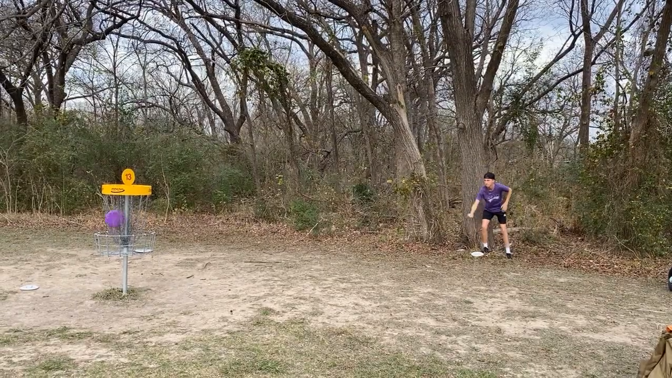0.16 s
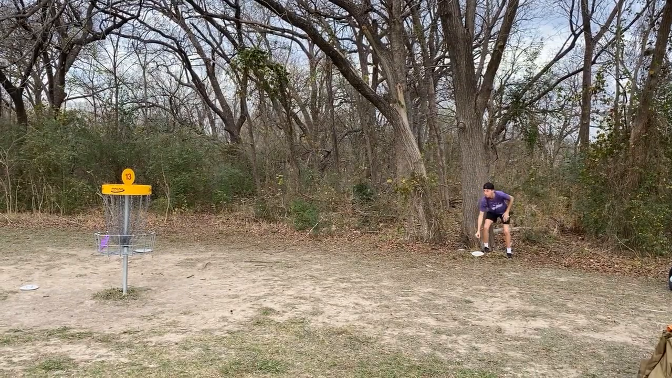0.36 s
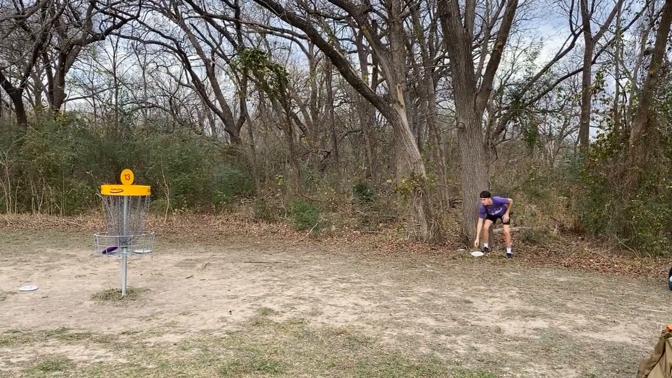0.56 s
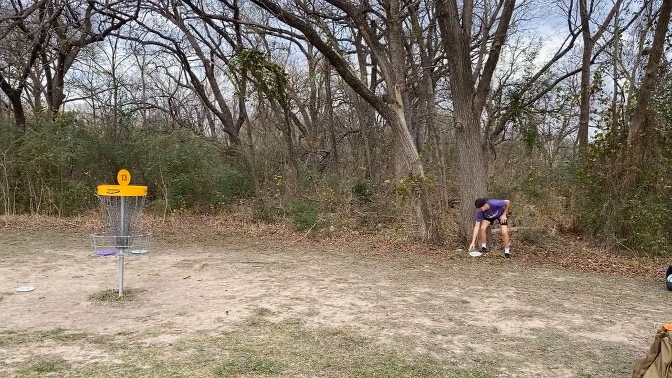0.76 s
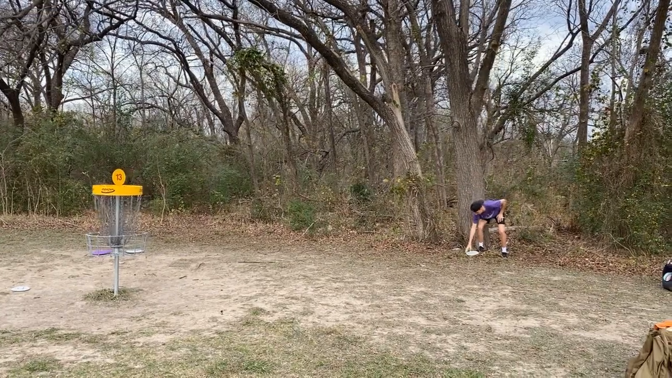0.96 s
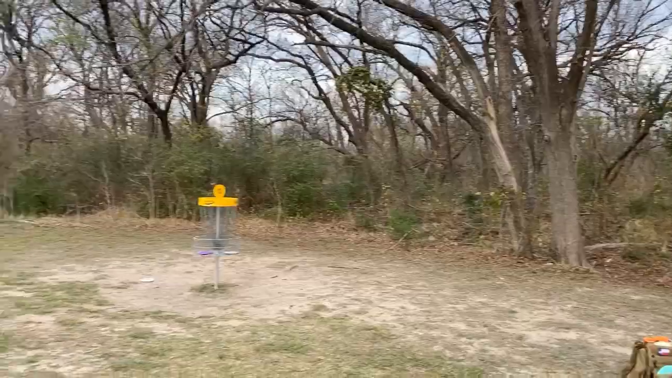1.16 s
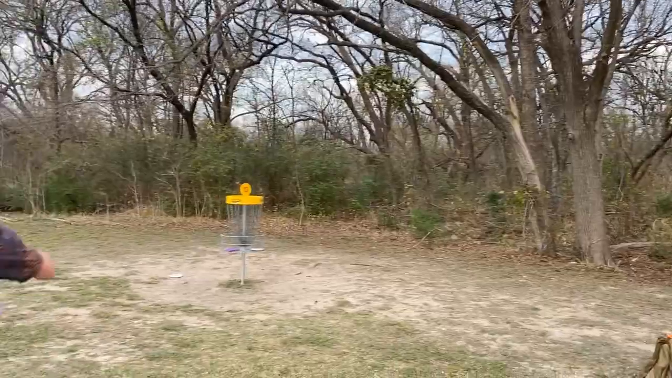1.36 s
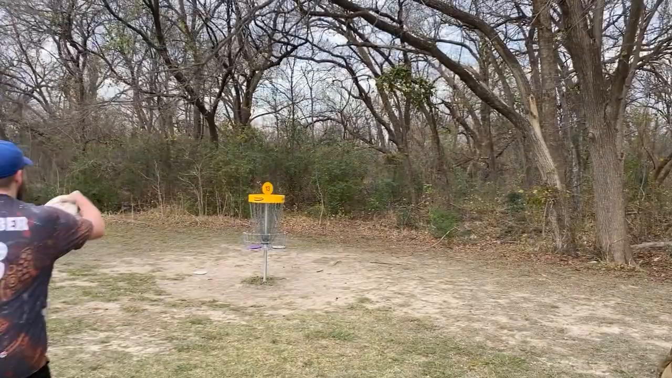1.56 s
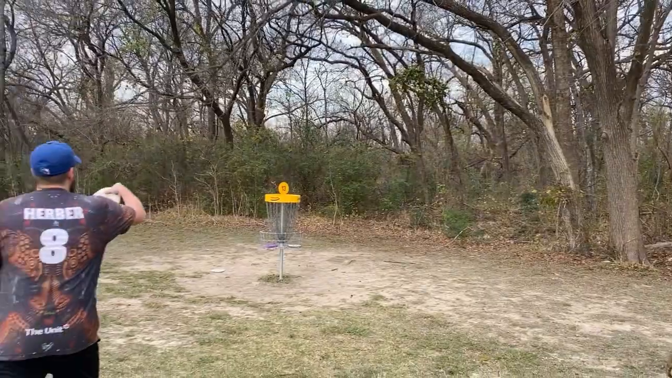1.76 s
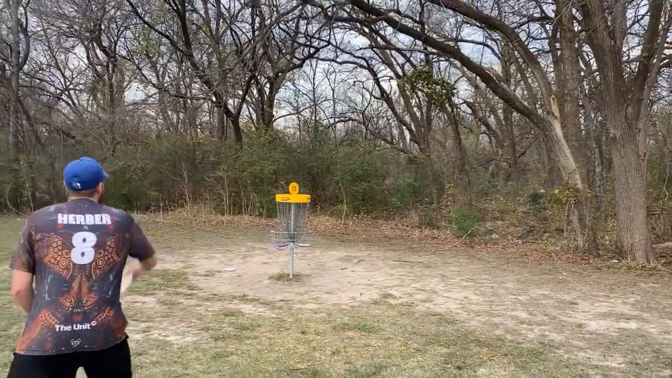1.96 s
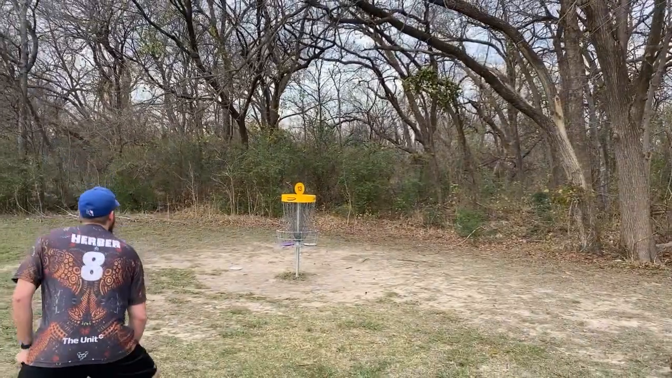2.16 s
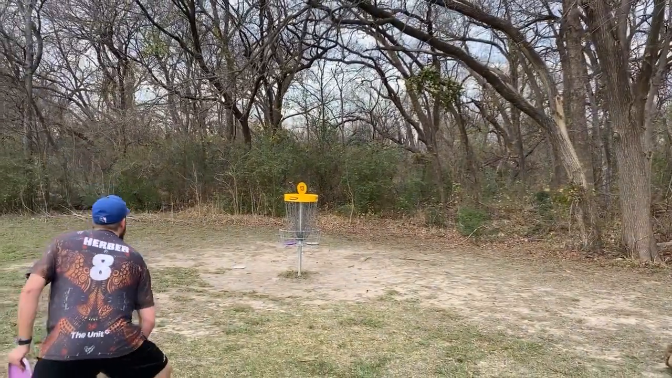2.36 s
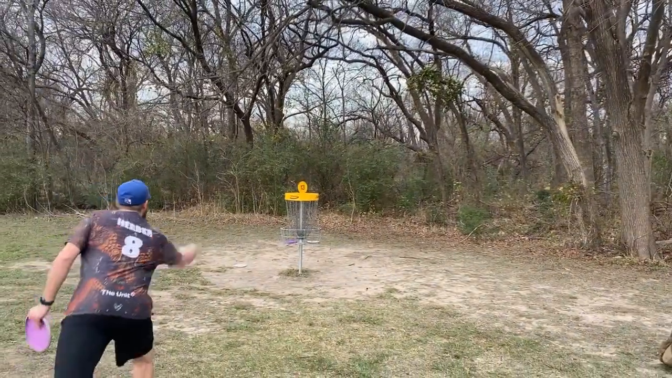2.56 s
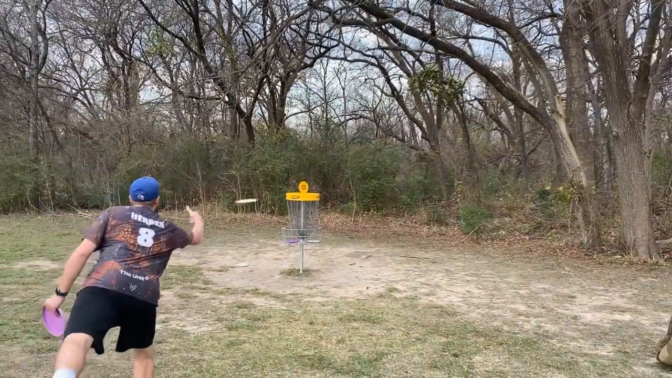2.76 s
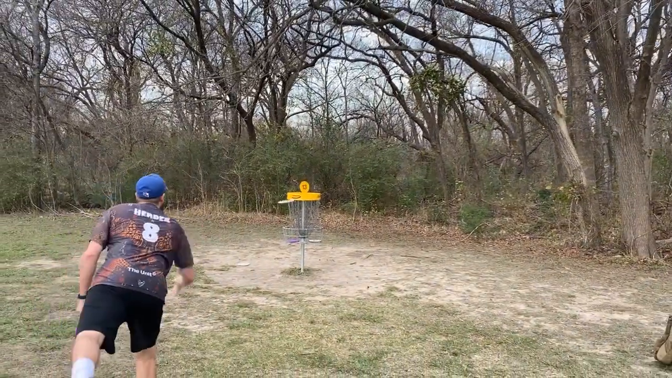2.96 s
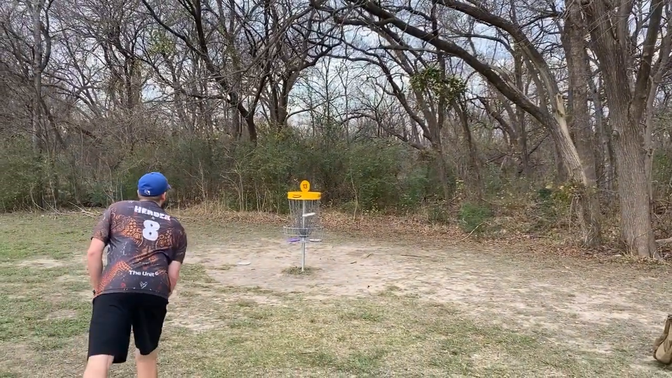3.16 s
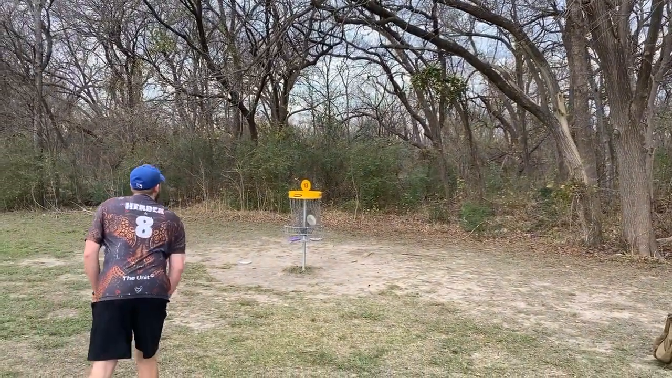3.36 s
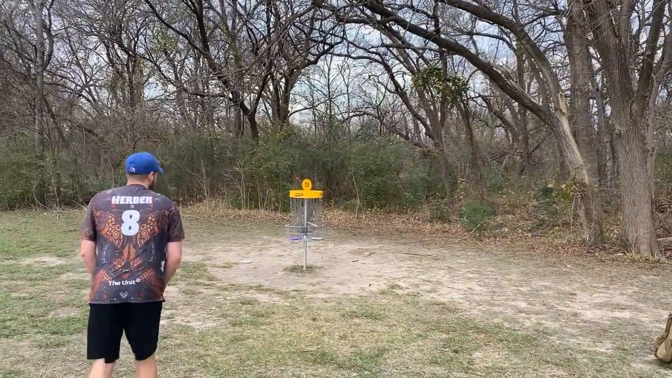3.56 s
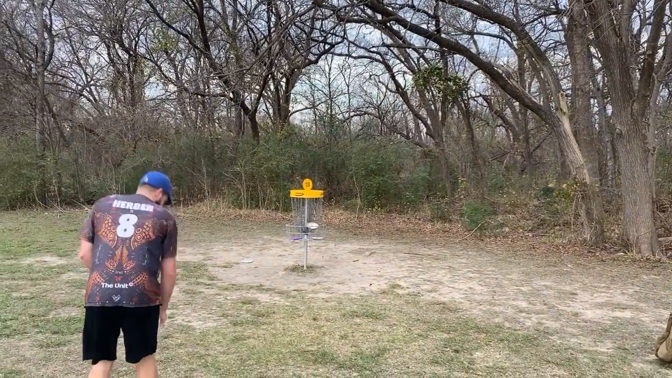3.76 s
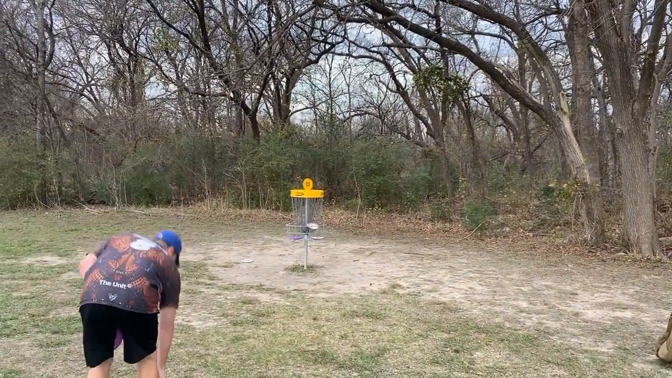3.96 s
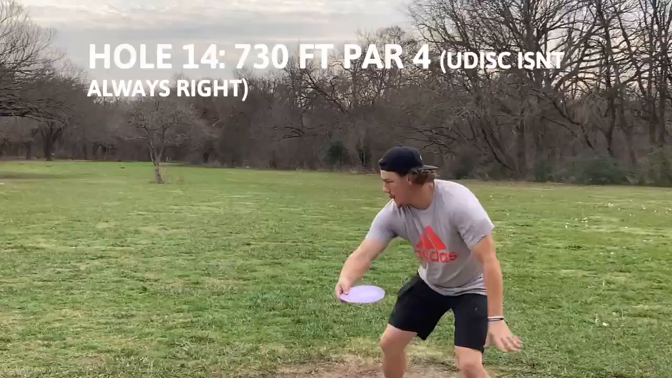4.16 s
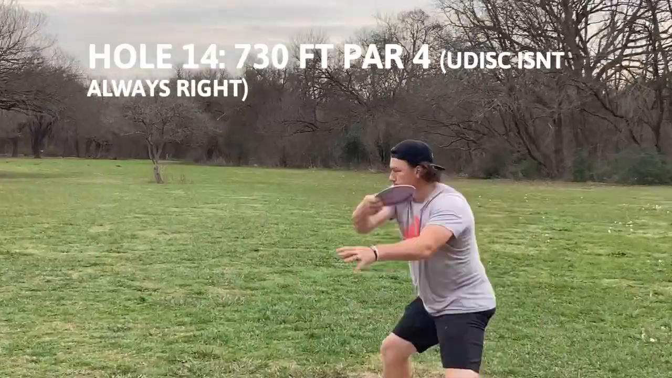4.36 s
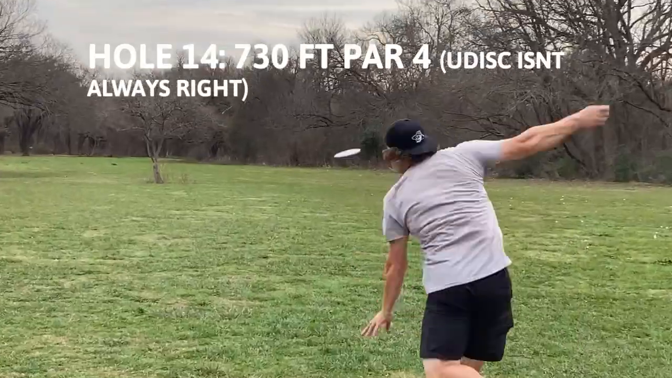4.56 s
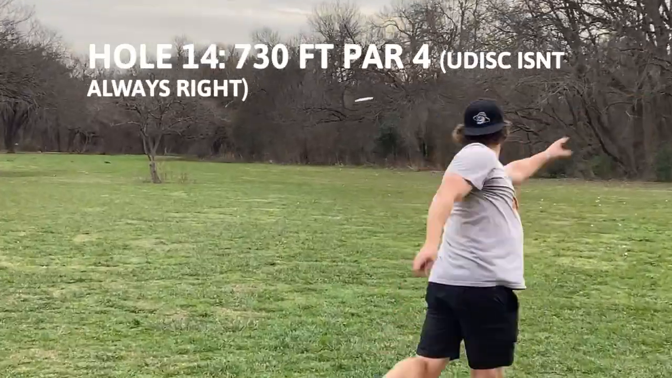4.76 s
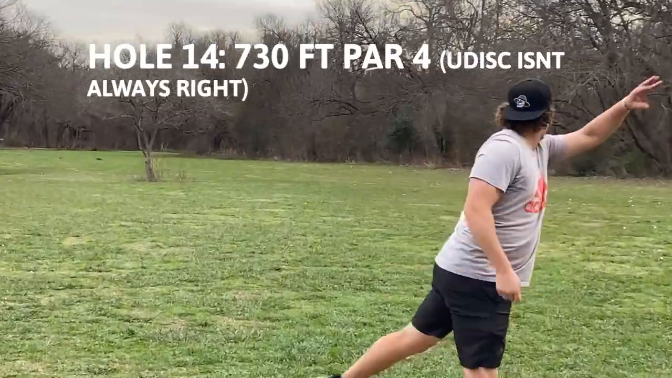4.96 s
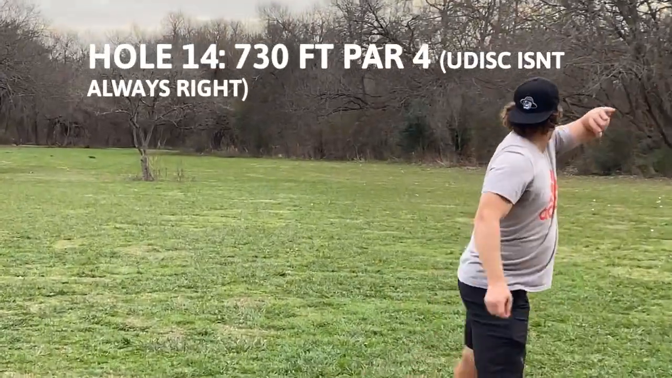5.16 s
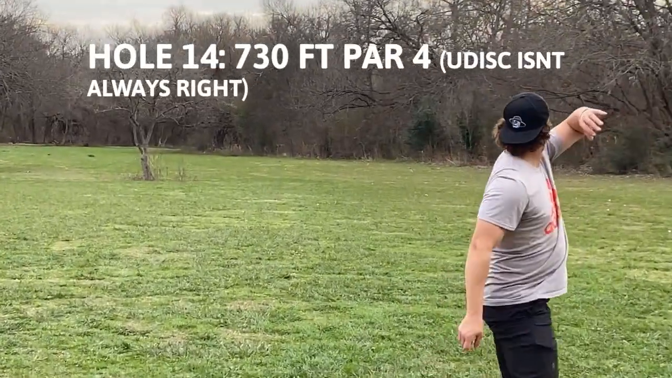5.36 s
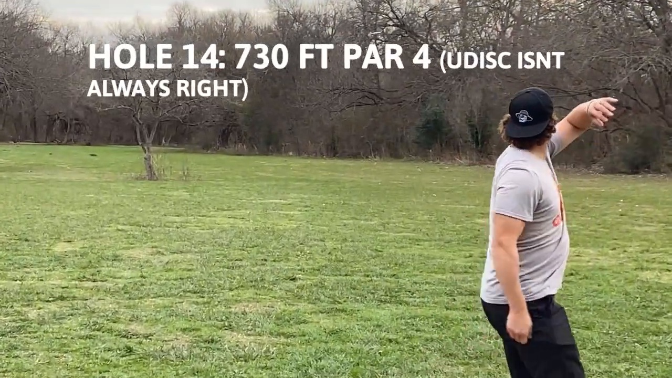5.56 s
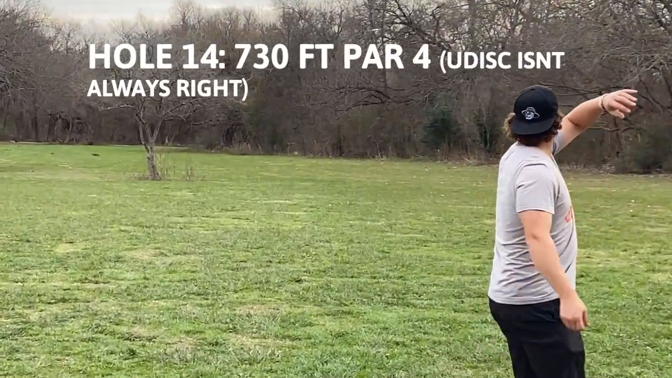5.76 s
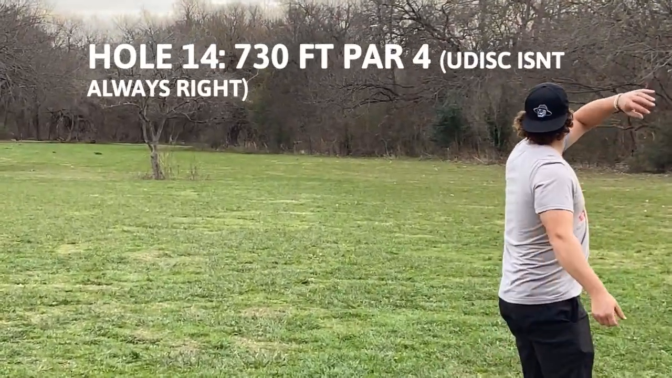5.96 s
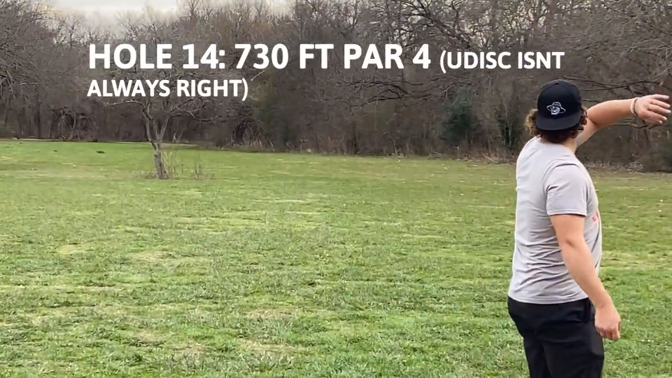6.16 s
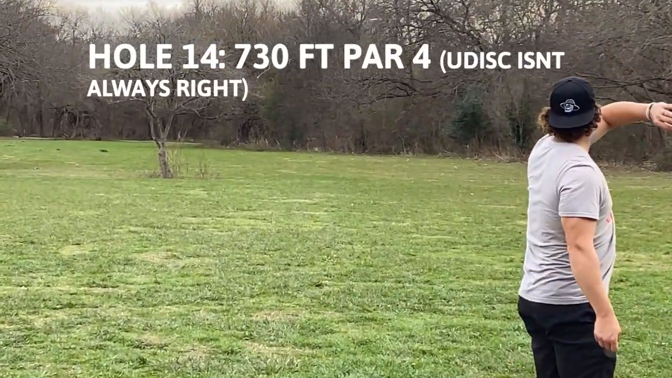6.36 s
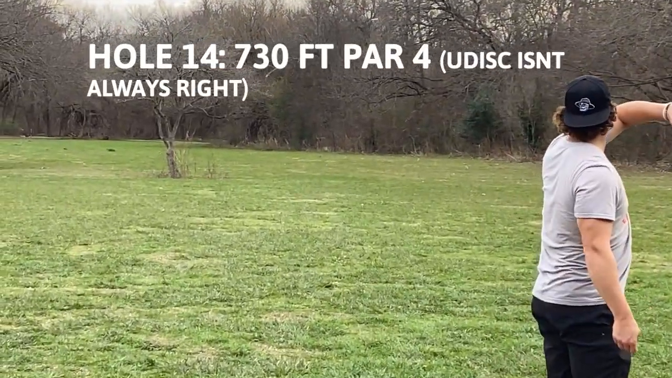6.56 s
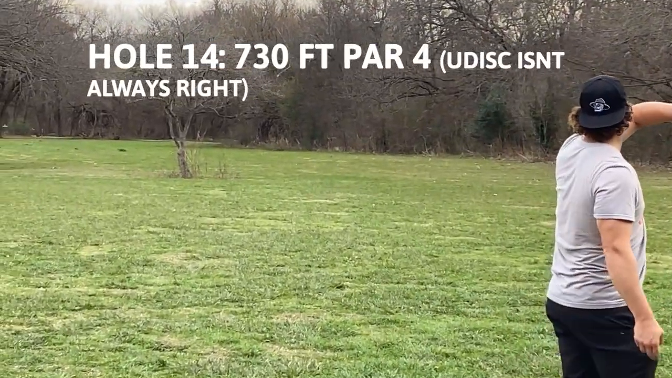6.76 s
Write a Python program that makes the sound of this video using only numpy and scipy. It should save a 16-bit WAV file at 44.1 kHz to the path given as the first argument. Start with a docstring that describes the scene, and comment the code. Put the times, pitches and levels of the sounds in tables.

```python
"""Over the hum of distant traffic a putt hits the chains of a disc golf basket in a wood: struck steel links ring
and jingle, the plastic disc clacks, and pole and tray sing on as stored energy returns; it ends abruptly at 1.1 s.
Shoes then scuff grass as crackling noise and a car swells past as filtered noise. A putt at another basket at 3.2 s
ends as abruptly at 4.2 s, a small bird peeping meanwhile in gliding whistles. Then a far engine, a sum of shaft
orders, speeds up; a player moves across a meadow, a far songbird repeats its motif, and a near one joins in."""
import sys
import numpy as np
from scipy import signal
from scipy.fft import rfft, irfft, next_fast_len
from scipy.io import wavfile
from scipy.ndimage import map_coordinates

SR = 44100
rng = np.random.default_rng(int(sys.argv[2]) if len(sys.argv) > 2 else 0)


def generate_wav(signal):
    """Clip the signal to [-1, 1] and save it as 16-bit WAV at the path in sys.argv[1]."""
    frames = np.transpose(np.atleast_2d(signal))
    scaled = np.clip(frames, -1, 1) * 32767
    pcm = np.round(scaled).astype(np.int16)
    wavfile.write(sys.argv[1], SR, pcm)


N = 300762
TIME = np.arange(N) / SR  # seconds
RING = np.arange(SR // 2) / SR  # seconds after a blow
TOP_HZ = 15600  # upper band limit of the whole sound

# Ends of the first two of three places, in seconds.
PLACE_ENDS = [1.107, 4.207]

# Distant traffic at each place. Each row: rumble in dB, low roar in dB, tyre hiss in dB, all before slow drift.
PLACES = [(-42.5, -55, -54), (-42.5, -52, -49.5), (-43.5, -53.5, -56.5)]
# Relative noise spectra of far roads, of a passing car's tyres, and of leaves and open air.
# Each row: frequency in Hz, level in dB per Hz.
RUMBLE = [(12, -43.5), (20, -18.5), (29, -23), (41, -2.5), (70, 3), (119, -1), (156, -9), (225, -12.5),
          (275, -21.5), (400, -22.5), (520, -47.5), (880, -120)]
ROAR = [(150, -13), (260, 0), (400, -1), (620, 3.5), (800, 1), (1100, -12), (2000, -36), (6000, -71)]
TYRES = [(500, -20), (800, 5), (1000, 5), (1500, -1.5), (2100, -9.5), (3000, -17.5), (5000, -29),
         (9000, -38), (15000, -50)]
CAR = [(500, -24), (800, -2), (1050, 11), (1400, -4), (2200, -31), (5000, -49.5), (10000, -71.5)]
AIR = [(1500, -20), (3000, 0.5), (7300, -1), (10000, -7), (13000, -11), (15000, -24)]
CAR_S, CAR_WIDTH_S, CAR_DB = 3.105, 0.16, -48  # when the car is nearest, how long it stays near, its peak level
AIR_DB = -75

# Far engine's speed. Each row: time in seconds, shaft speed in Hz before a slight wander.
ENGINE = [(4.2, 34.3), (4.46, 35.1), (4.86, 42.12), (6.03, 50.46), (6.82, 49.6)]
# Weights of the second, third and fourth shaft orders, in dB.
ENGINE_ORDERS = [0, 0, -6]
# How strongly an order carries at each pitch. Each row: frequency in Hz, level in dB.
EXHAUST = [(66, -41.5), (71, -40), (76, -33), (83, -42), (100, -46.5), (110, -56.5), (125, -46),
           (150, -49.5), (168, -72), (197, -53)]

# Reverberation of the wood. Each row: frequency in Hz, t60 in seconds.
WOOD = [(200, .4), (3000, 0.94), (6000, 0.65), (14000, 0.22)]

# Far songbird's motif. Each row: start within the motif in seconds, length in seconds,
# four pitches evenly spread over the note in Hz, level in dB before the gain of the repeat.
MOTIF = [(0, .056, 2606, 3350, 3730, 3870, -56), (.155, 0.0326, 2660, 2550, 2610, 2730, -55.5),
         (.21, .042, 3250, 3130, 2850, 2450, -54)]
# Repeats of the motif. Each row: start in seconds, gain in dB.
MOTIF_STARTS = [(4.191, -3.5), (4.537, -5), (4.879, -3.5), (5.233, -5)]
# Near songbird's phrase. Each row: start within the phrase in seconds, length in seconds,
# four pitches evenly spread over the note in Hz, level in dB before the gain of the repeat.
PHRASE = [(0, .096, 1880, 2480, 2770, 2765, -56), (.108, .051, 3440, 3000, 3315, 3750, -49.5),
          (.191, .12, 4595, 4080, 3440, 3160, -48), (.361, .037, 4860, 3350, 2755, 2815, -52.5),
          (.406, .043, 2422, 2470, 2323, 1770, -55)]
# Repeats of the phrase. Each row: start in seconds, gain in dB.
PHRASE_STARTS = [(5.238, -8), (5.785, 0), (6.339, 0)]
JOINS_S = 5.55  # the near bird joins in near the end of its first phrase
# A small bird's calls. Each row: start in seconds, pitch in the middle of the call in Hz, level in dB.
PEEPS = [(3.676, 3190, -53.5), (3.765, 3150, -68), (3.915, 2900, -66), (3.984, 2900, -64),
         (4.145, 2975, -62)]

# Relative noise spectrum of crackling grass. Each row: frequency in Hz, level in dB per Hz.
GRASS = [(300, -20), (900, -9.5), (1800, 11.5), (3200, 10.5), (5000, 6.5), (8000, 5.5), (13000, -1),
         (15500, -8.5)]
# Relative noise spectrum of a landing heel. Each row: frequency in Hz, level in dB per Hz.
THUD = [(80, 2), (300, 5.5), (1800, -1), (4000, -29.0)]
# Shoes and clothes brushing the grass. Each row: peak in seconds, rise and fall time in seconds, level in dB.
SCUFFS = [(1.141, .025, -68.5), (1.285, .02, -62.5), (1.39, .09, -63.5), (1.66, 0.05, -64.5),
          (1.93, 0.066, -57), (2.06, .06, -59.5), (2.235, 0.041, -51.5), (2.49, 0.054, -69.5),
          (2.88, 0.016, -63), (2.99, .04, -64.5), (4.475, 0.038, -42), (4.843, 0.019, -49),
          (4.99, 0.086, -56.5), (5.17, 0.065, -61), (5.33, 0.051, -58), (5.435, 0.009, -46.5),
          (6.37, 0.107, -62.5)]
# Swings of arm, cloth and sole. Each row: peak in seconds, width in seconds, level in dB, centre in Hz.
SWISHES = [(.99, .06, -45.5, 650), (1.085, .018, -42.5, 614), (1.36, 0.043, -49, 1620),
           (2.26, 0.026, -49.5, 1470), (2.96, 0.0384, -52, 600), (4.46, 0.019, -39.5, 1650),
           (4.487, 0.0077, -41.5, 1480), (4.84, 0.0197, -53, 1995), (5.433, 0.012, -47, 726)]
# Footfalls and snapping stalks. Each row: start in seconds, initial crackle in dB, initial thud in dB.
STEPS = [(1.111, -64, -38), (1.4424, -51.5, -41.5), (1.959, -58, -39.5), (2.7689, -55, -59),
         (2.969, -65, -37.5), (4.2794, -50, -43.5), (4.3233, -48.5, -43.5), (4.5723, -49.5, -46.5),
         (5.1015, -48.5, -49), (5.1273, -48, -55), (5.1821, -43, -56), (5.24, -50.5, -39.5),
         (5.4361, -44, -48), (6.151, -65, -50)]
STIR_DB, STILL_S = -72, 5.5  # faint rustle of the players, and when this rustle stops

# The plastic disc striking steel. Each row: start in seconds, force of the blow in dB, nominal body pitch in Hz.
KNOCKS = [(.003, -29, 793), (.021, -32.5, 900), (.047, -33.5, 715), (.068, -30.5, 786), (.12, -33.5, 800),
          (0.175, -37, 843), (.266, -31.5, 830), (.274, -33, 847), (0.347, -39, 830), (.362, -38, 1040),
          (.488, -39.5, 790), (3.2303, -30, 953), (3.252, -33.5, 1073), (3.267, -30.5, 880),
          (3.279, -31.5, 1063), (3.302, -36.5, 1100), (3.498, -52, 1090), (3.619, -46, 1120)]
# Nominal modes of the disc. Each row: ratio to the body pitch, level in dB, t60 in seconds.
DISC = [(1, 2, 0.058), (1.25, -1.5, 0.029), (1.8, -5.5, 0.047), (2.35, -7, .03), (3.15, -7.5, 0.028),
        (3.75, -10, 0.033)]
# Relative noise spectrum of the disc's crack. Each row: frequency in Hz, level in dB per Hz.
CRACK = [(100, -14), (220, -3.5), (420, -12), (800, -6.5), (3500, -4), (8000, -24.5)]

# Long tones of pole and tray, one set for each of the two baskets. Each row: frequency in Hz, relative level in dB.
FIRST_CAGE = [(1443, -62.5), (1852, -58), (1895, -58.5), (2132, -68.5), (2406, -60), (2778, -62),
              (2869, -67), (3063, -56), (3187, -65), (3451, -61), (3655, -68.5), (3720, -68), (3973, -66.5),
              (4161, -67)]
SECOND_CAGE = [(1480, -61.5), (1658, -67.5), (1744, -68), (2412, -64), (2972, -64.5), (3214, -67),
               (3332, -58), (3531, -72), (3784, -69), (3881, -72)]
# High tones shared by both baskets. Each row: frequency in Hz, relative level in dB.
CAGE_SHIMMER = [(5259, -67.5), (5490, -68.5), (6584, -73.5), (7343, -69.5), (8150, -74), (9115, -69.5),
                (9679, -70.5)]
# Relative noise spectrum of the dense wire modes. Each row: frequency in Hz, level in dB per Hz.
WIRES = [(1100, -20.5), (1500, -5.0), (1900, 7.5), (2300, -1.5), (3200, 3), (4200, -11), (6000, -12.0), (11000, -32)]

# Bending modes and high modes of a link.
# Each row: centre in Hz, fractional spread between links, nominal level in dB, nominal t60 in seconds.
BENDING = [(4514, .003, 0, 0.19), (4592, .004, 1, .22), (4720, .007, -4.5, .15), (4900, 0.028, -11.5, 0.12)]
HIGH = [(9200, .02, -15.5, 0.11), (11850, .015, 3.5, 0.18), (12800, .013, -0.5, 0.11),
        (14500, 0.022, -22, 0.09)]
# Filter on the clatter of steel on steel. Each row: frequency in Hz, gain in dB.
CONTACT = [(500, -10.5), (900, 1), (1900, -0.5), (2300, -10.5), (3300, 2), (4100, -5), (5100, 4),
           (6500, -2), (8000, 2.5), (10500, -3.5), (13000, -7), (15500, -20)]
# The curtain of chains bunches up, then settles. Each row: peak in seconds, rise in seconds,
# bending ring in dB, high ring in dB, contact clatter in dB before its filter.
SWINGS = [(.01, 0.028, -26.5, -28, -30), (0.056, 0.022, -27.5, -26.5, -32.5), (.095, .018, -27, -31, -28.5),
          (.266, 0.0053, -27, -46, -46), (.315, 0.019, -37, -34.5, -42), (.485, 0.047, -37.5, -34.5, -40),
          (.58, .015, -52, -38.5, -54), (.655, 0.014, -45, -47.5, -55), (.885, .005, -48.5, -57, -59),
          (.93, .01, -37.5, -43, -44.5), (1.03, .03, -49, -51, -55.5), (3.24, .006, -49, -35.5, -36),
          (3.285, .02, -37, -22.5, -30), (3.335, .02, -46, -34.5, -39), (3.4, .03, -46.5, -32.5, -43.5),
          (3.506, 0.01, -41.5, -41, -34.5), (3.622, .008, -49, -40, -44.5),
          (3.676, .025, -61, -40.5, -54.5), (3.865, 0.0072, -72, -69, -58.5), (4.19, 0.1, -79, -48, -63.5)]
# Whole strands slapping together. Each row: start in seconds, bending ring in dB, high ring in dB,
# clatter in dB, all before damping and the contact filter.
CLASHES = [(0.075, -23, -36.5, -25.5), (.085, -18.5, -39, -34), (0.1022, -15.5, -21.5, -26),
           (.111, -20, -29.5, -33.5), (.118, -25.5, -35, -40.5), (.2575, -23, -43.5, -38.5),
           (0.292, -32.5, -30.5, -42), (0.321, -25, -39.5, -39), (.476, -43, -32.5, -33),
           (0.4903, -24.5, -31, -34.5), (0.6513, -37, -48, -55), (0.7007, -38.5, -45.5, -56),
           (0.879, -44.5, -47, -53.5), (0.9158, -37, -47, -43.5), (0.928, -32.5, -40, -49.5),
           (0.9871, -47, -41, -62), (3.2297, -34, -32.5, -31.5), (3.255, -36, -26, -32),
           (3.285, -32, -22.5, -28.5), (3.4946, -36, -34.5, -40), (3.503, -35, -37, -37),
           (3.6156, -47, -42.5, -46), (3.8612, -58, -52, -65), (3.949, -62, -50, -64),
           (4.0257, -68, -46.5, -59), (4.092, -70, -47, -70)]
# a swing's quick drop, its slow settling, and the level where settling takes over
DROP_DB_PER_S, SETTLE_DB_PER_S, SETTLE_DB = 330, 62, -9
# collisions a second at this clatter level, and their growth with the level (dB per dB)
CHAIN_RATE, BUSY_DB, RATE_GROWS = 560, -41.5, .4


def amp(db):
    """Amplitude ratio of a level: 20 dB for each factor of ten."""
    return 10 ** (np.asarray(db) / 20)


def unit(x):
    """Normalisation to rms 1."""
    return x / np.sqrt(np.mean(x ** 2) + 1e-20)


def along(points, hz):
    """Interpolation of (Hz, value) points on a log frequency axis."""
    f, v = np.transpose(points)
    return np.interp(np.log(hz + 1), np.log(f + 1), v)


def curves(rows):
    """Linear interpolation in time: one curve for each column after the time."""
    s, *cols = np.transpose(rows)
    return [np.interp(TIME, s, c) for c in cols]


def wobble(rate):
    """Smooth random modulation, from random knots at this rate a second."""
    knots = rng.standard_normal(int(N * rate / SR) + 4)
    return map_coordinates(knots, [TIME * rate])


def swell(s, width):
    """Gaussian envelope: a smooth rise and fall around time s."""
    return np.exp(-.5 * ((TIME - s) / width) ** 2)


def filtered(x, response):
    """Linear filtering: the spectrum of x times a response of frequency."""
    size = next_fast_len(len(x) + SR // 4)
    return irfft(rfft(x, size) * response(np.fft.rfftfreq(size, 1 / SR)), size)[:len(x)]


def coloured(x, spectrum):
    """Spectral shaping of x, brought to rms 1."""
    return unit(filtered(x, lambda hz: amp(along(spectrum, hz))))


def noise(spectrum, size=N):
    """Coloured noise: white noise shaped by a spectrum, at rms 1."""
    return coloured(rng.standard_normal(size), spectrum)


def decay(t60):
    """Exponential free decay of a struck body: 60 dB in t60 seconds."""
    return np.exp(-np.log(1000) * RING / max(t60, 1e-3))


def add(track, s, sound):
    """Superposition of a sound on the track from time s."""
    part = track[max(round(s * SR), 0):]
    part[:len(sound)] += sound[:len(part)]


def trees(x, wet_db):
    """Scattering by trunks: a soft tail of decaying noise follows the direct sound."""
    hz, t, z = signal.stft(rng.standard_normal(SR), SR, nperseg=256)
    tail = signal.istft(z * amp(-60 * t / along(WOOD, hz)[:, None]), SR, nperseg=256)[1]
    return x + amp(wet_db) * signal.fftconvolve(x, tail / np.linalg.norm(tail))[:N]


def traffic():
    """Incoherent sum of far sources: drifting rumble, roar and tyre hiss, open air, and one car swelling past."""
    rumble_db, roar_db, tyre_db = np.array(PLACES)[np.searchsorted(PLACE_ENDS, TIME)].T
    roads = amp(rumble_db + .8 * wobble(8)) * noise(RUMBLE)
    roads += amp(roar_db + 1.5 * wobble(8.4)) * noise(ROAR)
    roads += amp(tyre_db + 0.41 * wobble(5)) * noise(TYRES)
    car = amp(CAR_DB) * swell(CAR_S, CAR_WIDTH_S) * noise(CAR)
    return roads + car + amp(AIR_DB) * noise(AIR)


def engine():
    """Harmonics of a quickening shaft: low orders boom as they cross the exhaust's resonances."""
    shaft_hz, = curves(ENGINE)
    turn = 2 * np.pi * np.cumsum(shaft_hz * (1 + 0.0055 * wobble(15))) / SR
    hum = np.zeros(N)
    for order, db in enumerate(ENGINE_ORDERS, 2):
        level_db = db + along(EXHAUST, order * shaft_hz) + 1.15 * wobble(11)
        hum += amp(level_db) * unit(np.sin(order * turn))
    return hum * np.clip((TIME - PLACE_ENDS[1]) / 0.0152, 0, 1)


def note(length, *pitches):
    """Frequency modulation: a pure whistle glides smoothly through its pitches."""
    u = np.linspace(0, 1, int(length * SR))
    knots = np.linspace(0, 1, len(pitches))
    hz = np.polyval(np.polyfit(knots, pitches, len(pitches) - 1), u)
    return unit(np.sin(2 * np.pi * np.cumsum(hz) / SR) * signal.windows.tukey(len(u), .3))


def song(notes, starts, from_s=0):
    """Repetition of one set of whistled notes, leaving out those that start before from_s."""
    track = np.zeros(N)
    for start, gain_db in starts:
        for s, *shape, db in notes:
            if start + s > from_s:
                add(track, start + s, amp(db + gain_db) * note(*shape))
    return track


def far_bird():
    """Amplitude fluctuation on the way through branches: a three-note motif flutters."""
    return song(MOTIF, MOTIF_STARTS) * amp(3.6 * wobble(90))


def near_birds():
    """Nearly pure tones: loud slurred whistles, and a small bird's arched peeps with their octave."""
    track = song(PHRASE, PHRASE_STARTS, JOINS_S)
    for s, hz, db in PEEPS:
        arch = hz * np.array([.96, 1, 1.01])
        add(track, s, amp(db) * note(.05, *arch) + amp(-71.5) * note(.05, *(2 * arch)))
    return track * amp(1.18 * wobble(70))


def player():
    """Friction and impact noise: grass crackles under moving shoes, cloth swishes, heels land."""
    stir = amp(STIR_DB) * (TIME > PLACE_ENDS[0]) * (TIME < STILL_S)
    power = stir ** 2
    for s, width, db in SCUFFS:
        power = power + (amp(db) * np.exp(-np.abs(TIME - s) / width)) ** 2
    # sparse random impulses, about 7000 a second
    stalks = rng.standard_normal(N) * (rng.random(N) < 7000 / SR)
    track = np.sqrt(power) * coloured(stalks, GRASS)
    for s, width, db, hz in SWISHES:
        hump = [(hz / 8, -14), (hz / 2, -8), (hz, 0), (hz * 2, -12), (hz * 7, -38), (hz * 20, -60)]
        track += amp(db) * swell(s, width) * noise(hump)
    for s, db, thud_db in STEPS:
        add(track, s, amp(db) * noise(GRASS, size=len(RING)) * decay(0.041))
        add(track, s, amp(thud_db) * noise(THUD, size=len(RING)) * decay(0.07))
    return track


def disc():
    """Modal ringing of a heavily damped body: the plastic disc gives short, hollow clacks."""
    track = np.zeros(N)
    squash = 1 - np.exp(-RING / 0.00022)  # the rim yields for a moment
    for s, db, hz in KNOCKS:
        body = np.zeros(len(RING))
        for ratio, level, t60 in DISC:
            strength = amp(level + rng.normal(0, 4.5))
            mode_hz = hz * ratio * rng.normal(1, 0.044)
            body += strength * decay(t60) * np.sin(2 * np.pi * mode_hz * RING)
        crack = noise(CRACK, size=len(RING)) * decay(0.075)
        add(track, s, amp(db) * squash * (.85 * body + 1.29 * crack))
    return track


def cage(blows, modes, t60, db, wires_db):
    """Energy storage: pole and tray return the blows as long tones over a wash of wire modes."""
    keep = np.exp(-2 * np.log(1000) / (t60 * SR))  # energy kept from one sample to the next
    stored = np.sqrt(signal.lfilter([1 - keep], [1, -keep], blows ** 2))
    tones = np.zeros(N)
    for hz, level in modes + CAGE_SHIMMER:
        # each tone beats against a weaker, randomly detuned twin
        twin = .5 * np.sin(2 * np.pi * (hz + rng.normal(0, 10)) * TIME)
        tones += amp(level) * (np.sin(2 * np.pi * hz * TIME) + twin)
    return stored * (amp(db) * unit(tones) + amp(wires_db) * noise(WIRES))


def link(modes, grip=0.78, contact_s=0.00006):
    """Modal ringing: no two links are alike, and neighbours damp some more than others."""
    free = np.exp(grip * rng.normal())
    ring = np.zeros(len(RING))
    for hz, spread, db, t60 in modes:
        strength = amp(db + rng.normal(0, 4.3))
        mode_hz = hz * (1 + spread * rng.normal())
        ring += strength * decay(t60 * free) * np.sin(2 * np.pi * (mode_hz * RING + rng.random()))
    return ring * (1 - np.exp(-RING / contact_s)) ** 2


def contact(t60, count=16):
    """Impact of steel on steel: a tiny crack and short, scattered partials."""
    hz = rng.uniform(1400, 15000, (count, 1))
    partials = np.sin(2 * np.pi * hz * RING).sum(0) / np.sqrt(count)
    crack = 1.3 * rng.standard_normal(len(RING)) * decay(0.0044)
    return partials * decay(t60) + crack


def collisions(voices, level_db, rate, start, end, scatter_db):
    """Random impact process: links collide at random moments and together carry the given level."""
    passed = np.cumsum(rate * (TIME >= start) * (TIME < end)) / SR  # collisions so far
    count = int(passed[-1])
    moments = np.searchsorted(passed, np.arange(count) + rng.random(count))
    sizes = unit(amp(scatter_db * rng.standard_normal(len(moments)))) * rng.choice([-1, 1], len(moments))
    voices = [v / np.linalg.norm(v) for v in voices]
    track = np.zeros(N)
    for i, size in zip(moments, sizes):
        # rarer collisions are each stronger, so the rate leaves the power unchanged
        strength = size * amp(level_db[i]) * np.sqrt(SR / rate[i])
        add(track, i / SR, strength * voices[rng.integers(len(voices))])
    return track


def slap(voices, spread, count=6):
    """Succession of impacts: a strand lands link after link within milliseconds, at rms 1 over 1/80 s."""
    burst = np.zeros(len(RING))
    for delay in np.r_[0, rng.exponential(spread, count - 1)]:
        add(burst, delay, voices[rng.integers(len(voices))])
    return burst / np.sqrt(np.mean(burst[:SR // 80] ** 2))


def swinging(start, end):
    """Two-stage decay, in dB for bending, high and clatter: a swing swells, drops quickly, settles slowly."""
    power = np.full((3, N), 1e-12)
    slow = min(amp(SETTLE_DB), 1)
    for s, rise, *levels in SWINGS:
        if start <= s < end:
            age = np.maximum(TIME - s, 0)
            fall = (1 - slow) * amp(-DROP_DB_PER_S * age) + slow * amp(-SETTLE_DB_PER_S * age)
            power += np.outer(amp(levels), np.where(TIME < s, swell(s, rise), fall)) ** 2
    return 10 * np.log10(power)


def chains(start, end, count=60):
    """Many-body impact, as (ring, clatter): harder swings of the curtain give more link collisions."""
    bend_db, high_db, clatter_db = swinging(start, end)
    rate = np.clip(CHAIN_RATE * amp(RATE_GROWS * (clatter_db - BUSY_DB)), 160, 1500)  # a second
    bends = [link(BENDING) for _ in range(count)]
    highs = [link(HIGH) for _ in range(count)]
    ticks = [contact(t60=0.043) for _ in range(count)]
    ring = collisions(bends, bend_db, rate, start, end, scatter_db=3.5)
    ring += collisions(highs, high_db, rate, start, end, scatter_db=5.5)
    # links also graze each other, twice as often as they ring
    clatter = collisions(ticks, clatter_db, 2 * rate, start, end, scatter_db=5)
    for s, bend, high, crack in CLASHES:
        if start <= s < end:
            # pressed against the disc, the struck links are soon damped
            strand = amp(bend) * slap(bends, .002) + amp(high) * slap(highs, .003)
            add(ring, s, strand * decay(0.11))
            add(clatter, s, amp(crack) * slap(ticks, 0.0039) * decay(.15))
    return ring, filtered(clatter, lambda hz: amp(along(CONTACT, hz)))


def scene():
    """Superposition of all sources: two putts, each ending abruptly, among birds, players and far traffic."""
    birds = trees(far_bird(), wet_db=-5.0) + trees(near_birds(), wet_db=-9.5)
    background = traffic() + engine() + birds + player()

    ring, clatter = chains(0, PLACE_ENDS[0])
    # once the disc has landed in the tray, the blows drive pole and tray harder, rising 8 dB from 0.25 to 0.4 s
    in_tray = amp(np.interp(TIME, [.25, .4], [0, 8]))
    tones = cage(clatter * in_tray, FIRST_CAGE, t60=1.7, db=-13.0, wires_db=-16)
    first = trees(ring + clatter + tones, wet_db=-16.0)

    ring, clatter = chains(3.229, PLACE_ENDS[1])
    tones = cage(clatter, SECOND_CAGE, t60=0.49, db=-13.0, wires_db=-19)
    second = trees(ring + clatter + tones, wet_db=-23.5)

    baskets = first * (TIME < PLACE_ENDS[0]) + second * (TIME < PLACE_ENDS[1])
    return background + trees(disc(), wet_db=-16.0) + baskets


def record(dry):
    """Ideal low-pass filtering: nothing at or above the band limit remains."""
    return filtered(dry, lambda hz: hz < TOP_HZ)


dry = scene()
out = record(dry)
generate_wav(out)
```